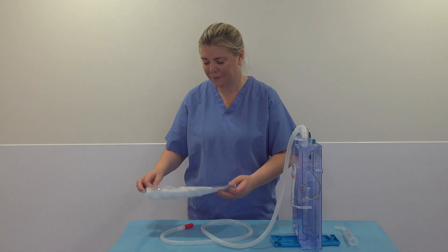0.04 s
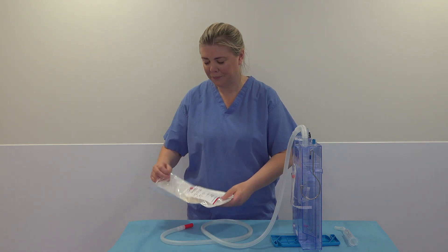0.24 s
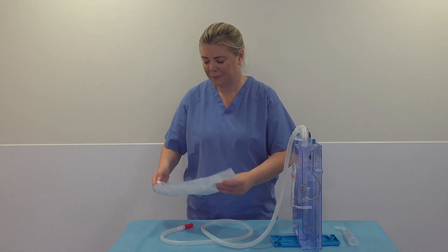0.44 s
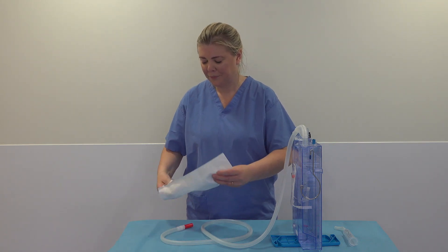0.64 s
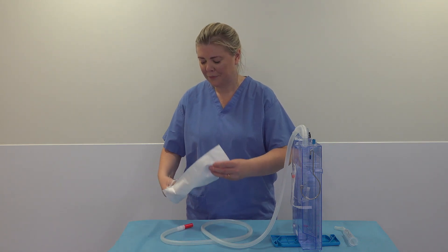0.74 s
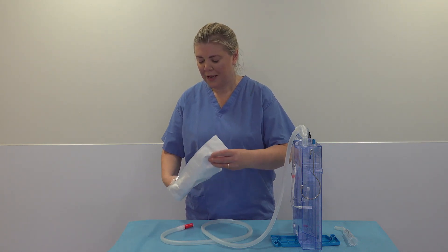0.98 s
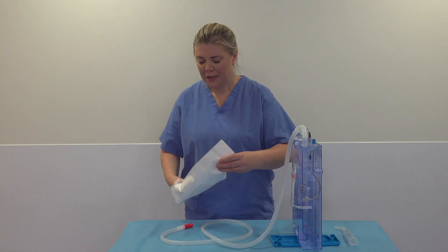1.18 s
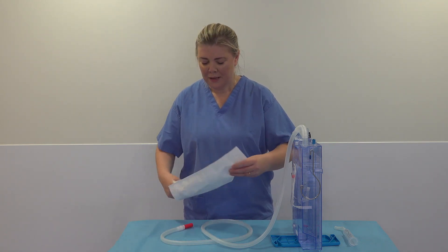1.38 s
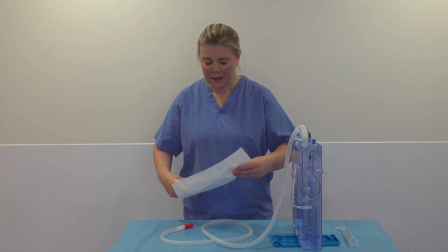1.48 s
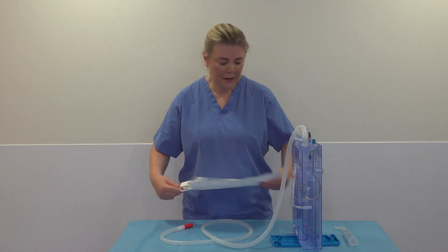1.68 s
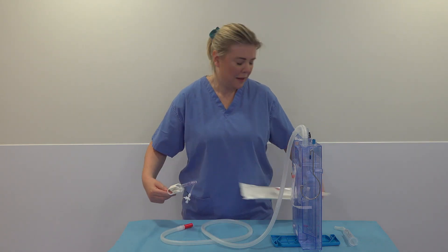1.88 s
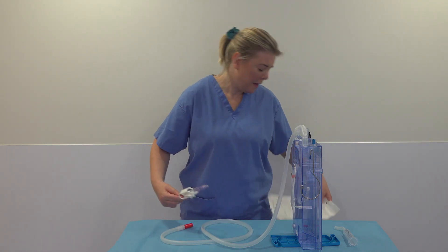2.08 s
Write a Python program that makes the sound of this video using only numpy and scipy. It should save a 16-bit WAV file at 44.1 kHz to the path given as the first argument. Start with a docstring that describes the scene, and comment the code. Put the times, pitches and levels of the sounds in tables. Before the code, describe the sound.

In a small, bare room, a paper and plastic medical wrapper is peeled open in quick, uneven tugs. The film crinkles, the paper rubs under the fingers and larger creases crack sharply in clusters. Then the wrapper slips off its contents with a brief grainy swish and the rustling grows lighter. A short room echo and a faint steady rumble and hiss lie behind it.

```python
"""A fine crinkle and a papery rub, joined at once by sharp snaps: hands pull open a sterile pouch
of paper and plastic film in a small bare room. Tiny creases tick, paper slides under the fingers
and the fibres of the seal part. Bigger creases buckle with a crack that sets the sheet shivering.
Near the end the wrapper slides off its contents in one swish. The room echoes over faint air noise."""
import sys
import numpy as np
from scipy import signal
from scipy.fft import rfft, irfft
from scipy.io import wavfile

SR = 44100
rng = np.random.default_rng(int(sys.argv[2]) if len(sys.argv) > 2 else 0)


def store_pcm(level_fs):
    """Save levels as 16-bit WAV."""
    pcm = np.round(np.clip(level_fs, -1, 1) * 32767).astype(np.int16)
    wavfile.write(sys.argv[1], SR, np.atleast_2d(pcm).T)


N = 93580

# pulls of the hands, with a gain for each layer:
# (start [s], length [s], film crinkle [dB], paper rub [dB], parting fibres [dB])
HAND_PULLS = [ (0, 0.071, -37, -47, -47), (0.118, 0.063, -40, -39.5, -56), (0.226, 0.045, -38, -42, -50),
              (0.295, 0.044, -43.5, -46, -60), (0.404, 0.074, -39, -43, -51), (.58, 0.069, -41.5, -48, -51),
              (0.636, 0.056, -38, -39.5, -45), (0.728, 0.028, -38.5, -40, -64),
              (0.839, 0.11, -47, -41.5, -52), (1.015, .14, -41, -42, -48.5),
              (1.214, 0.025, -39.5, -57.5, -54), (1.308, 0.03, -41, -41.5, -48),
              (1.471, 0.035, -43.5, -48, -56), (1.56, 0.19, -44.5, -47, -53),
              (1.844, 0.04, -48.5, -60, -55.5), (1.98, .05, -52.5, -59, -63),
              (2.06, 0.018, -50.5, -45.5, -67)]
# gains while the pouch is just held: (film [dB], paper [dB], fibres [dB])
HOLDING_DB = (-52, -57, -73)
# tone of the buckling sheet: (frequency [Hz], level [dB])
SHEET_TONE = [(60, -54), (160, -17), (240, -18.5), (480, 0), (1500, 1.5), (5000, 1.5), (7500, -5.5),
              (9500, -1), (11500, -14.5), (14000, -8), (16000, -12)]
# tone of the crinkling film: (frequency [Hz], level [dB])
FILM_TONE = [(400, -48), (1500, -4.5), (2500, -8), (3400, -0.5), (5000, -6), (7500, -9.5), (9500, -14.5),
             (11500, -15.5), (15500, -38)]
# tone of the rubbed paper: (frequency [Hz], level [dB])
PAPER_TONE = [(80, -43), (160, -31.5), (230, -8.5), (330, -4.5), (480, 2), (750, -0.5), (1300, 0.5),
              (2200, -0.5), (4000, -12.5), (12000, -44)]
# tone of the seal's parting fibres: (frequency [Hz], level [dB])
FIBRE_TONE = [(2000, -37), (5000, 12), (7000, 5.5), (9500, -18), (11500, -7), (13500, -1.5), (16000, -5.5)]
# tone of the room's air: (frequency [Hz], level [dB])
AIR_TONE = [(22, -30), (37, 2.5), (55, -19), (80, -8), (98, 2), (120, -5.5), (165, -7), (230, 4.5),
            (600, -10.5), (2000, -4.5), (6000, -5.5), (15500, -26)]
# how long the room rings: (frequency [Hz], time to fade by 60 dB [s])
RING_TIMES = [(200, 0.75), (660, 0.38), (1700, 0.35), (4500, 0.36), (9000, 0.35), (15000, 0.27)]
# buckling creases; a facet is a small flat patch of sheet between creases:
# (time [s], crack peak [dB], shiver level [dB], facet pitch [Hz], width of its ring [octaves])
BUCKLING_CREASES = [ (0.0193, -20, -28, 4300, .53), (0.023, -34, -30, 1300, 0.49),
                    (.061, -28, -37, 6040, 0.68), (0.1224, -13, -21.5, 3100, 0.32),
                    (.129, -34, -26, 1600, 0.8), (0.2117, -32, -25.5, 5530, 0.59),
                    (.225, -24, -31.5, 8100, 1), (0.2416, -17, -43, 4370, 0.54),
                    (.256, -31, -27.5, 2170, 0.67), (0.3125, -38, -29.5, 1510, 0.51),
                    (0.3203, -22, -28, 1600, 0.85), (0.3509, -10, -22.5, 3420, 1),
                    (0.406, -22, -34, 5940, 0.64), (0.4315, -18, -28, 3400, 0.23),
                    (.483, -20, -29.5, 3400, .63), (.578, -32, -31, 3280, 0.27),
                    (.626, -19, -26, 3580, 0.69), (.638, -19, -33, 1560, 0.52),
                    (0.672, -20, -30.5, 3630, 1), (0.6996, -19, -36, 5000, 0.61),
                    (.7176, -33, -25, 4140, .68), (.7245, -14, -17, 4280, 0.3), (.727, -11, -30, 920, 0.73),
                    (0.8915, -23, -32.5, 4550, .2), (0.955, -22, -25.5, 5700, 0.59),
                    (0.9988, -37, -33, 1090, 1), (1.0178, -22, -39, 4270, 0.34),
                    (1.055, -38, -32.5, 2850, .84), (1.0926, -18, -26, 1940, .98),
                    (1.1424, -24, -26.5, 1660, 0.46), (1.1816, -17.5, -17.5, 5190, 0.37),
                    (1.1841, -12.5, -23.5, 1223, 0.078), (1.198, -28, -27.5, 3270, 0.15),
                    (1.2773, -30, -27, 3530, 0.49), (1.3825, -32.5, -30.5, 2450, 0.93),
                    (1.457, -28, -37.5, 1070, 1), (1.468, -18.5, -35.5, 4700, 1),
                    (1.685, -40, -36.5, 870, 0.18), (1.7043, -29, -32.5, 2800, 0.28),
                    (1.733, -25.5, -30.5, 6960, 0.69), (1.8305, -37, -38, 3200, 0.47),
                    (2.0517, -36.5, -39, 2360, 1), (2.093, -35, -35.5, 3500, 0.22)]
# tone of the sliding wrapper: (frequency [Hz], level [dB])
SWISH_TONE = [(90, -42), (160, -29), (230, -17), (420, -3), (620, 0.5), (850, 2), (1200, -1.5), (3200, 2),
              (5500, -0.5), (9000, -10), (11500, -19), (15500, -17)]


def amp(db):
    """Turns decibels into a gain."""
    return 10 ** (np.asarray(db) / 20)


def unit(x):
    """Scales a sound to an average (rms) level of 1."""
    return x / np.sqrt(np.mean(x ** 2) + 1e-20)


def read(table, hz):
    """Looks up a table, sliding between its rows on a log-frequency axis."""
    row_hz, value = np.transpose(table)
    return np.interp(np.log(hz + 1), np.log(row_hz + 1), value)


def add(mix, start_s, sound):
    """Mixes a sound in at its start time."""
    part = mix[max(round(start_s * SR), 0):][:len(sound)]
    part += sound[:len(part)]


def coloured(x, tone):
    """Filters a sound with a tone table and scales it to level 1."""
    hz = np.fft.rfftfreq(len(x), 1 / SR)
    return unit(irfft(rfft(x) * amp(read(tone, hz)), len(x)))


def stroke(start_s, length_s, attack_s, release_s):
    """Gain of one hand movement: it builds smoothly up to its start, holds, then dies away."""
    t = np.arange(N) / SR - start_s
    rise = np.sin(np.pi / 2 * np.clip(1 + t / attack_s, 0, 1)) ** 2
    return rise * np.exp(-np.maximum(t - length_s, 0) / release_s)


def handling(attack_s=0.022, release_s=0.016, empty_s=1.78, lighter_db=-6.5):
    """Gains of film, paper and fibres: pulls on top of a grip that lightens once the pouch is empty."""
    grip_db = np.interp(np.arange(N) / SR, [empty_s - release_s, empty_s], [0, lighter_db])
    power = np.outer(amp(HOLDING_DB), amp(grip_db)) ** 2
    for start_s, length_s, *layers_db in HAND_PULLS:
        power += np.outer(amp(layers_db), stroke(start_s, length_s, attack_s, release_s)) ** 2
    return np.sqrt(power)


def facet(centre_hz, octaves, skirt_db, travel_s, dull_hz, size=2048):
    """Click of one small patch of sheet: a broad ring whose bending waves arrive treble first."""
    hz = np.fft.rfftfreq(size, 1 / SR)
    ring = np.exp(-.5 * (np.log2((hz + 1) / centre_hz) / octaves) ** 2)
    skirt = amp(skirt_db) / np.hypot(1, hz / dull_hz)  # weaker sound on both sides of the ring
    log_gain = np.log((ring + skirt) * amp(read(SHEET_TONE, hz)))
    # this phase makes the click start sharply and ring afterwards
    onset_phase = -signal.hilbert(np.r_[log_gain, log_gain[-2:0:-1]]).imag[:len(hz)]
    delay_s = travel_s * np.sqrt(centre_hz / (hz + 200))
    travel_phase = 2 * np.pi * np.cumsum(delay_s) * SR / size
    return irfft(np.exp(log_gain + 1j * (onset_phase - travel_phase)))


def crinkle(ticks_per_s=900, spread_db=1.0, trim_db=-0.77, facets=16):
    """Many tiny creases in the film, each ticking in one of a few facets."""
    ticks = (rng.random(N) < ticks_per_s / SR) * rng.choice([-1, 1], N)
    ticks = ticks * amp(spread_db * np.minimum(rng.exponential(1, N), 3))
    which, out = rng.integers(0, facets, N), np.zeros(N)
    for k, hz in enumerate(np.geomspace(1200, 12000, facets)):
        tick = facet(hz, octaves=0.45, skirt_db=-12.5, travel_s=.001, dull_hz=18400)
        out += signal.oaconvolve(ticks * (which == k), tick)[:N]
    return coloured(out, FILM_TONE) * amp(trim_db)


def rub(trim_db=-1, catch_db=2.5, catch_s=0.006):
    """Paper slides under the fingers, catching and letting go."""
    smoothing = np.hanning(int(2 * catch_s * SR))
    catch = unit(signal.fftconvolve(rng.standard_normal(N), smoothing, "same"))
    hiss = coloured(rng.standard_normal(N), PAPER_TONE)
    return unit(hiss * amp(catch_db * catch)) * amp(trim_db)


def slips(size, spread_db):
    """Grainy noise from countless tiny slips of uneven size."""
    return rng.standard_normal(size) * amp(spread_db * rng.standard_normal(size))


def parting_fibres():
    """The fibres of the seal let go in tiny slips, making a high hiss."""
    return coloured(slips(N, spread_db=2), FIBRE_TONE)


def room_air(level_db=-56):
    """The room's air: a faint, steady rumble and hiss."""
    return amp(level_db) * coloured(rng.standard_normal(N), AIR_TONE)


def echoes(tail_db=-4.5, early_db=-12, first_s=0.00078, build_s=0.015, count=7):
    """A few echoes off the table and near wall, then a blurred tail that dies sooner in the treble."""
    t = np.arange(SR // 2) / SR
    bounces = rng.choice([-1., 1.], len(t)) * (rng.random(len(t)) < 4000 / SR)
    hz, age_s, spectra = signal.stft(bounces, SR, nperseg=256)
    dying = amp(-60 * age_s / read(RING_TIMES, hz)[:, None])
    build = np.clip((t - first_s) / build_s, 0, 1)
    tail = signal.istft(spectra * dying, SR)[1][:len(t)] * build
    echo = amp(tail_db) * tail / np.linalg.norm(tail)
    early_s = np.linspace(.002, .021, count) * rng.uniform(.85, 1.15, count)
    echo[(early_s * SR).astype(int)] += amp(early_db) / np.sqrt(count)
    return echo


def room(x, turn_s=.022, paths=6):
    """The crumpling sheet keeps facing other ways, so its sound takes changing paths round the room."""
    facing, out = np.arange(N) / SR / turn_s, np.zeros(N)
    for k in range(paths):
        turned_away = np.minimum(abs((facing + k) % paths - paths / 2), 1)
        share = np.cos(np.pi / 2 * turned_away)
        out += signal.fftconvolve(x * share, echoes())[:N]
    return out


def flattened(burst):
    """Spreads the energy of a burst evenly from bass to treble and keeps its timing."""
    spectrum = rfft(burst)
    return irfft(spectrum / (abs(spectrum) + 1e-12), len(burst))


def snaps(mid_facet_hz=3000, mid_crack_hz=4060, mid_settle_s=0.0061, size=4096):
    """A crease flips with a crack; then the sheet around it shivers in uneven slips and settles."""
    t, out = np.arange(size) / SR, np.zeros(N)
    for start_s, crack_db, shiver_db, hz, width in BUCKLING_CREASES:
        # smaller, higher facets crack brighter and settle sooner than a mid-sized one
        pitch_ratio = hz / mid_facet_hz
        crack_hz = mid_crack_hz * pitch_ratio ** 0.34
        fade = np.exp(-t / mid_settle_s * pitch_ratio ** 0.67)
        crack = facet(crack_hz, octaves=0.74, skirt_db=-13.5, travel_s=0.0002985, dull_hz=16000)
        add(out, start_s, amp(crack_db) * crack / abs(crack).max())
        ring = facet(hz, octaves=width, skirt_db=-11.5, travel_s=0.0002904, dull_hz=4030)
        shaking = flattened(slips(size, spread_db=2) * fade) * fade ** 0.071
        shiver = signal.fftconvolve(shaking, ring)
        add(out, start_s, amp(shiver_db) * shiver * np.linalg.norm(fade) / np.linalg.norm(shiver))
    return out


def swish(level_db=-37):
    """The wrapper slides off its contents in one grainy stroke."""
    slide = stroke(start_s=1.65, length_s=0.063, attack_s=0.029, release_s=0.032)
    return amp(level_db) * slide * coloured(slips(N, spread_db=6), SWISH_TONE)


def scene():
    """The pouch, its echoes and the room's air, in one channel."""
    film, paper, fibres = handling()
    pouch = snaps() + film * crinkle() + paper * rub() + fibres * parting_fibres() + swish()
    air = room_air()
    return (pouch + room(pouch) + air)[None]


def record(dry, cutoff_hz=16050):
    """Cuts away the very highest treble."""
    low_pass = signal.firwin(401, cutoff_hz, window=("kaiser", 8), fs=SR)
    return signal.oaconvolve(dry, low_pass[None], "same")


dry = scene()
out = record(dry)
store_pcm(out)
```